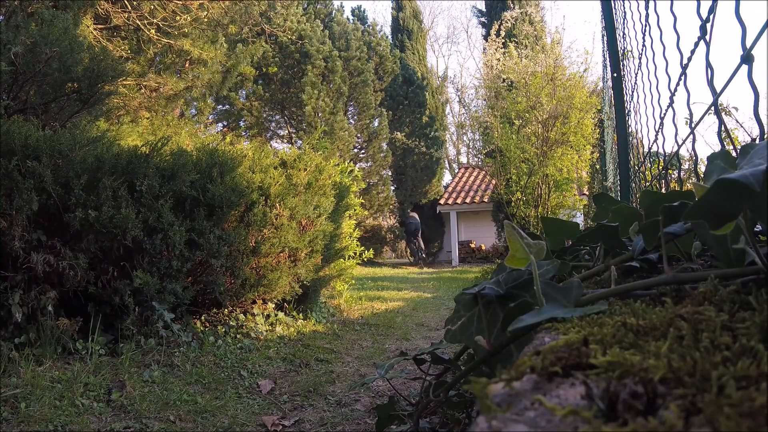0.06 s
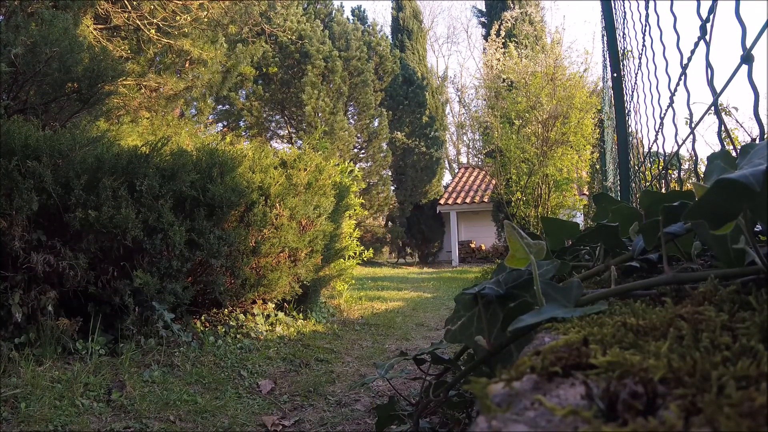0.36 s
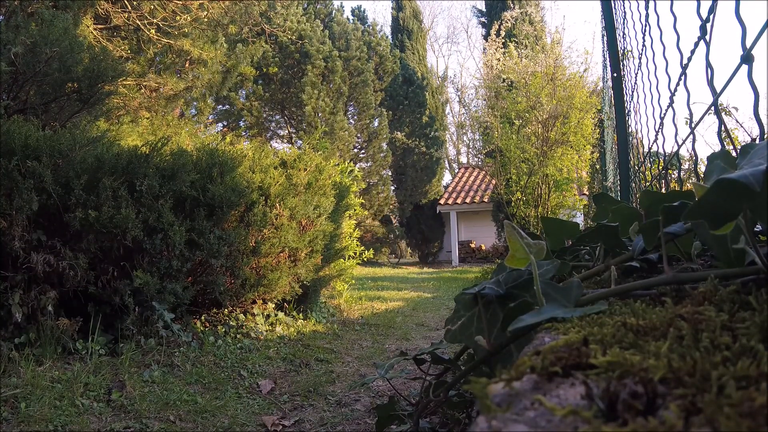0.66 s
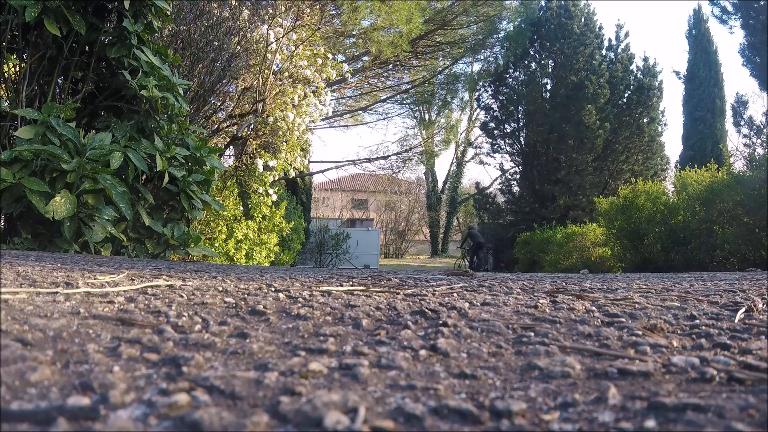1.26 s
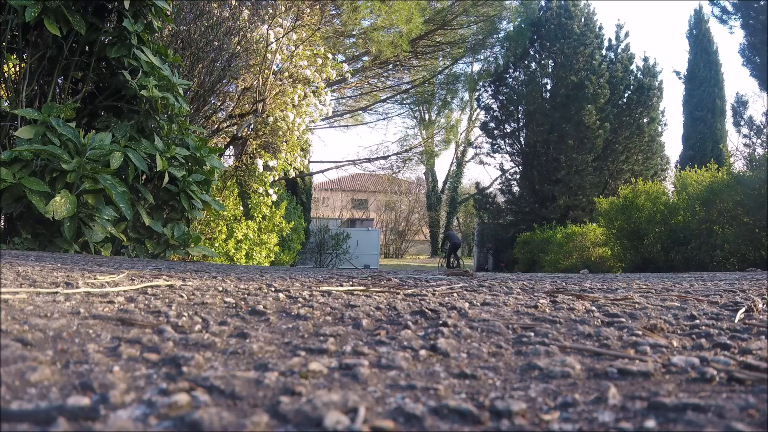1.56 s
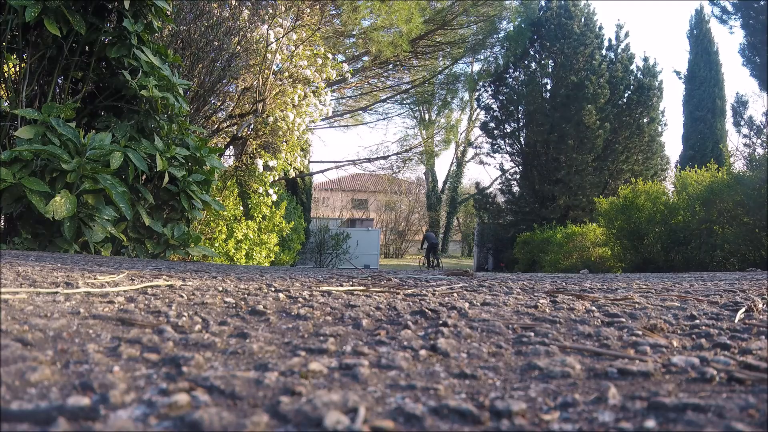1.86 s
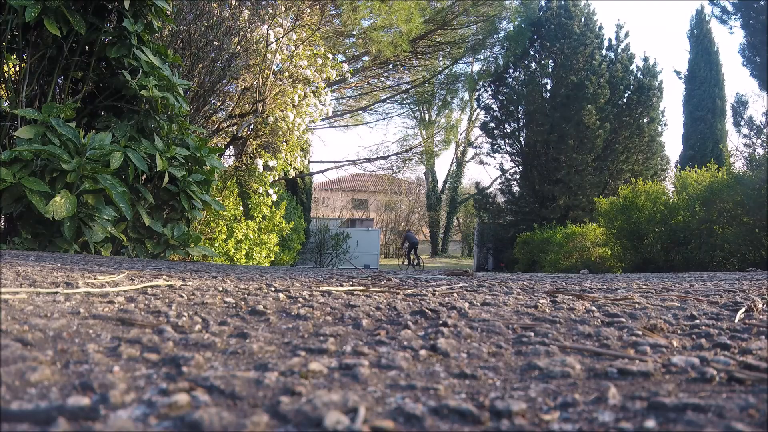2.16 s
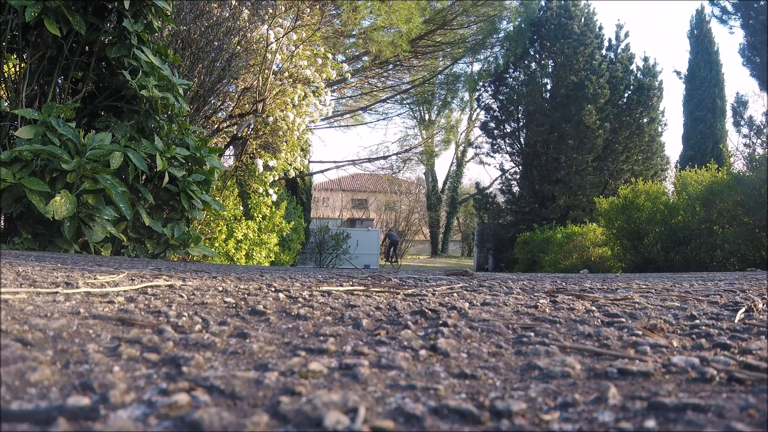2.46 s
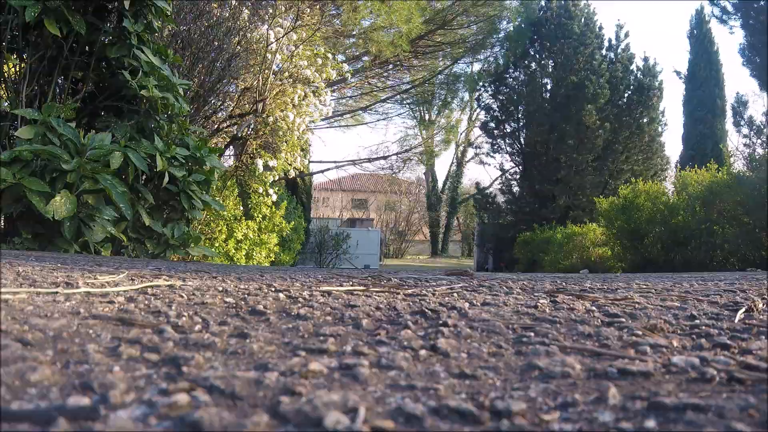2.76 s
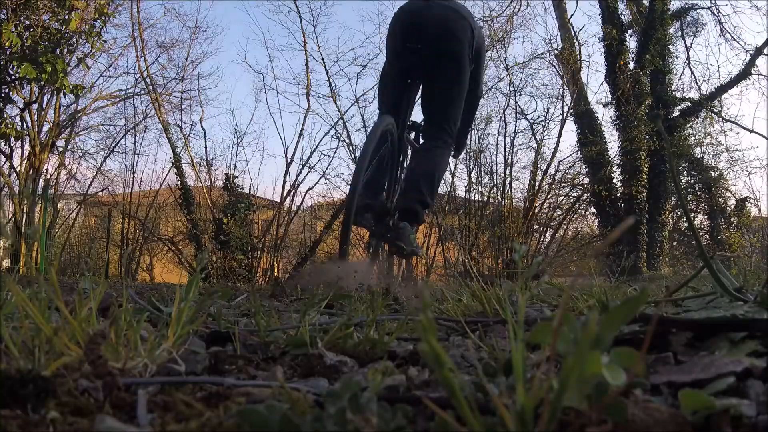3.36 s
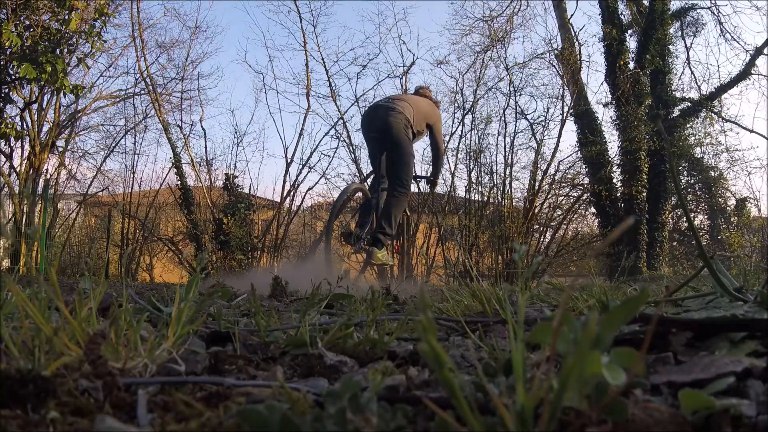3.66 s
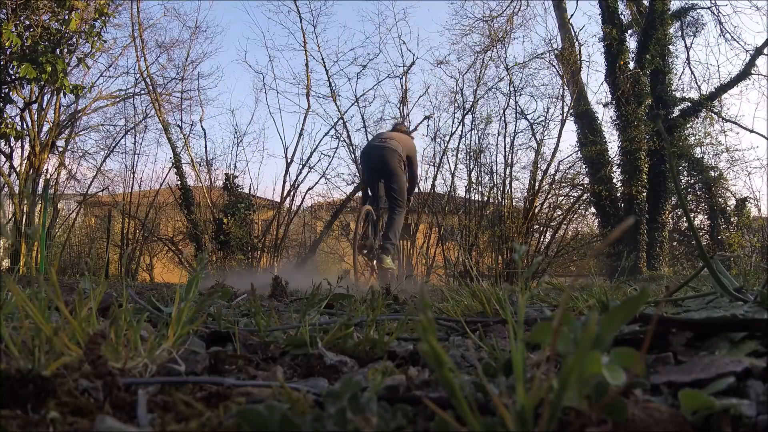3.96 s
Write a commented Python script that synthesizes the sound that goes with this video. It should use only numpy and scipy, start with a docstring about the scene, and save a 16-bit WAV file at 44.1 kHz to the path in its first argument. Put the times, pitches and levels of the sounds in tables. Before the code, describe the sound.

Bicycle tyres rush close past the microphone on dirt and grass, with loud crunching, thuds and stone knocks. Before that come soft freewheel ticks, faint birdsong and a growing gravel crackle over quiet outdoor air.

```python
"""Bicycle in a garden

Heard from three places in turn: it coasts away, freewheel pawls ticking; it crackles closer over
distant gravel while a small bird sings; then it rushes right past on dirt and grass. Up close the
tyres crush grit into tiny ringing grains, thud over bumps, flick stones and shake the frame."""
import sys
import numpy as np
from scipy import signal
from scipy.fft import rfft, irfft
from scipy.io import wavfile

SR = 44100
rng = np.random.default_rng(int(sys.argv[2]) if len(sys.argv) > 2 else 0)


def digitize_waveform(pressure):
    """Quantize a signal to 16-bit integers and store it at the path in sys.argv[1].

    Rows of a 2-D input are taken as channels; values are limited to [-1, 1].
    """
    field = np.atleast_2d(pressure).T
    bounded = np.clip(field, -1, 1)
    quanta = np.round(bounded * 32767).astype(np.int16)
    wavfile.write(sys.argv[1], SR, quanta)


N = 176400
T = np.arange(N) / SR
COAST_END_S, APPROACH_S, PASS_S = 1.158, 1.186, 2.889  # first place ends, second starts, third starts

# tone of the outdoor air at the first two places (frequency [Hz], gain [dB])
COAST_AIR_EQ = [(25, -21), (48, -12), (104, -43), (135, 0.5), (250, -4), (400, -9), (1000, -15),
                (2500, -22.5), (4500, -33.5), (6900, -24), (10500, -29.5), (15000, -45)]
APPROACH_AIR_EQ = [(25, -21.5), (102, -29.5), (132, -5.5), (165, 1.5), (260, -6), (450, -13), (1000, -17.5),
                   (4100, -32), (7000, -27), (10500, -34), (15000, -45)]
# its fader at each place (time [s], level [dB])
COAST_AIR_FADER = [(0, -56), (.35, -58.5), (.55, -60.5), (.9, -62), (1.16, -61.5)]
APPROACH_AIR_FADER = [(1.19, -54.5), (1.7, -54), (2.15, -55), (2.55, -52), (2.89, -56.5)]
# tone of the steady hiss (frequency [Hz], gain [dB])
HISS_EQ = [(4000, -25), (8000, 0), (14800, -1), (16000, -40)]

# bird twitters (time [s], length [s], start pitch [Hz], end pitch [Hz], level [dB])
CHIRPS = [(0.074, 0.034, 5050, 5330, -63), (0.144, 0.05, 6800, 6900, -67),
          (0.546, 0.035, 5930, 6200, -63.5), (1.26, 0.039, 6420, 6850, -63), (1.56, 0.036, 6800, 6060, -61)]
# cues of the two-note song (time [s])
SONG_CUES = [1.332, 1.645, 1.948]
# its notes (delay [s], pitch [Hz], level [dB], decay [s])
SONG_NOTES = [(0, 3567, -61, .075), (0.067, 4850, -61, 0.11)]

# distant tyres drawing nearer (time [s], level [dB])
CRACKLE_FADER = [(1.19, -68.5), (2.1, -69), (2.45, -61), (2.89, -54.5)]
# gravel popping under them (time [s], level [dB], rise [s])
PEBBLE_POPS = [(0.053, -62, 0.0083), (1.221, -26, 0.00024), (1.23, -49, 0.0027), (1.346, -37, 0.00014),
               (2.267, -41, 0.0021), (2.305, -48, 0.0025), (2.3465, -45.5, 0.0017), (2.493, -39, 0.0023),
               (2.537, -42.5, 0.002), (2.8, -40, 0.0041), (2.852, -36, 0.0053)]
# freewheel moving away (time [s], rate [ticks/s], level [dB])
FREEWHEEL_TICKS = [(.055, 20, -57.5), (.25, 39, -64), (.6, 34, -72), (1.15, 22, -76)]
# tone of the crackle, pops and ticks (frequency [Hz], gain [dB])
CRACKLE_EQ = [(200, -11), (1200, 1), (2500, -2.5), (4000, -17), (6000, -40), (7500, -36)]
POP_EQ = [(400, -8), (900, 4), (2700, 4), (4200, -5), (4900, 4.5), (5900, 5.5), (6900, -15.5), (15000, -41)]
PAWL_EQ = [(600, -6), (3000, -0.5), (6200, -2), (6900, -16), (15000, -39)]

# close tyres rolling (time [s], crunch [dB], rumble [dB], grit [dB])
ROLL_FADERS = [(2.889, -27, -22.5, -51), (2.91, -22, -35, -35.5), (2.99, -21.5, -29.5, -37),
               (3.04, -12, -18.5, -26.5), (3.108, -25, -18, -61), (3.22, -15, -22, -38),
               (3.39, -16, -29, -35), (3.45, -21.5, -24, -38.5), (3.51, -15, -24, -37),
               (3.57, -27.5, -27, -45), (3.645, -22, -26.5, -44.5), (3.725, -30, -39, -50.5),
               (3.8, -28, -33.5, -46.5), (3.92, -34, -37.5, -56), (4, -40, -36.5, -58)]
# surges as a tyre bites the ground (time [s], length [s], crunch [dB], rumble [dB], grit [dB])
TYRE_BITES = [(2.932, 0.032, -11, -20.5, -31), (3.005, 0.017, -13.5, -13.5, -27),
              (3.024, 0.076, -14.5, -38, -29.5), (3.116, 0.024, -10, -21, -30),
              (3.16, 0.012, -17.5, -30, -29), (3.17, 0.019, -11, -18, -56),
              (3.216, 0.012, -9.5, -21.5, -27), (3.323, 0.014, -15, -17, -36),
              (3.346, 0.01, -25, -44, -28.5), (3.374, 0.026, -25, -31, -27.5),
              (3.738, 0.017, -26.5, -52, -39.5), (3.775, 0.019, -34.5, -32, -39.5),
              (3.875, 0.015, -24.5, -31.5, -52), (3.954, 0.018, -26, -27.5, -69)]
# spray of dust and grass (time [s], level [dB])
FIZZ_FADER = [(2.889, -60.5), (2.94, -53.5), (3.4, -55.5), (3.6, -57), (4, -67)]
# dry stalks and sand grains cracking (time [s], level [dB])
STALK_SNAPS = [(2.9287, -40.5), (2.981, -42.5), (3.123, -41.5), (3.15, -41), (3.377, -44), (3.593, -48)]
# stones knocked aside (time [s], level [dB], pitch [Hz])
STONE_KNOCKS = [(3.0994, 1, 1650), (3.1217, -7, 800), (3.1898, -11, 980), (3.2066, -14, 2530),
                (3.2242, -10, 1670), (3.2455, -5.5, 1540), (3.3237, 0, 1119), (3.3284, -4, 1430),
                (3.351, -3.5, 1850), (3.3871, -3.5, 1310), (3.64, -13, 1030), (3.659, -35, 1210),
                (3.746, -21, 1380), (3.826, -15.5, 730), (3.844, -18, 1350)]
# a low thump as the scene changes to the close pass, then wheel thuds (time [s], level [dB], pitch [Hz])
LOW_THUMPS = [(2.883, -19.5, 111), (3.039, -9, 144), (3.119, -6, 147), (3.187, -11.5, 194),
              (3.326, -8, 227)]
# resonances of wheels and frame (frequency [Hz], bandwidth [Hz], gain [dB])
FRAME_MODES = [(316, 43, -8.5), (727, 25, 0), (1454, 40, -5)]
# tone of each close layer (frequency [Hz], gain [dB])
FIZZ_EQ = [(2000, -16), (6500, -1), (9000, -1.5), (11000, -3.5), (11800, -13), (15000, -21)]
SNAP_EQ = [(2500, -6), (4500, -3), (10500, -0.5), (15000, -22)]
GRIT_EQ = [(500, -15), (2000, 6.5), (3000, -3.5), (4200, -3.5), (6200, -6.5), (6700, -21), (15000, -30)]
RUMBLE_EQ = [(25, -15), (95, -32), (128, -7), (200, 1.5), (320, 0), (430, -13), (700, -12.5), (4000, -76)]
CRUNCH_EQ = [(100, -39), (250, -10.5), (450, -1), (750, 0.5), (950, -1.5), (1300, 1.5), (2000, -3.5),
             (2700, -6.5), (3500, -19), (6000, -66), (15000, -76)]


def amp(db):
    """Decibels to gain."""
    return 10 ** (np.asarray(db) / 20)


def unit(x):
    """Scales to rms 1."""
    return x / np.sqrt(np.mean(x ** 2) + 1e-20)


def curve(rows, column=1):
    """One column of a table as an automation curve."""
    rows = np.array(rows)
    return np.interp(T, rows[:, 0], rows[:, column])


def add(mix, start_s, sound):
    """Drops a sound into the mix at its cue."""
    part = mix[max(round(start_s * SR), 0):][:len(sound)]
    part += sound[:len(part)]


def eq(x, points):
    """Minimum-phase EQ of unit energy: the points set only the tone."""
    size = 8192
    hz, db = np.transpose(points)
    bins_hz = np.fft.rfftfreq(size, 1 / SR)
    log_gain = np.log(amp(np.interp(np.log(bins_hz + 1), np.log(hz + 1), db)))
    cepstrum = irfft(log_gain)
    cepstrum[1:size // 2] *= 2  # folded forward, so nothing rings ahead of a hit
    cepstrum[size // 2 + 1:] = 0
    taps = irfft(np.exp(rfft(cepstrum)))[:size // 2]
    return signal.oaconvolve(x, taps / np.linalg.norm(taps))[:N]


def lowpass(x, hz, order):
    """Smooth roll-off above hz."""
    return irfft(rfft(x) / np.sqrt(1 + (np.fft.rfftfreq(N, 1 / SR) / hz) ** (2 * order)), N)


def wander(rate_hz):
    """Smooth random modulation of rms 1."""
    rolloff = 1 + (np.fft.rfftfreq(N, 1 / SR) / rate_hz) ** 4
    return unit(irfft(rfft(rng.standard_normal(N)) / rolloff, N))


def clicks(per_s, spread_db):
    """Random fractures as clicks of uneven size."""
    size = amp(spread_db * np.minimum(rng.exponential(1, N), 4))
    return unit(size * rng.choice([-1, 1], N) * (rng.random(N) < per_s / SR))


def grains(per_s, spread_db, clump_db, decay_cycles, sizes=14):
    """Grit of many sizes, each with its own short ring and its own clumps."""
    t, out = np.arange(SR // 20) / SR, np.zeros(N)
    for hz in np.geomspace(300, 7000, sizes):
        ring = np.exp(-t * hz / decay_cycles) * np.sin(2 * np.pi * hz * t)
        train = clicks(per_s / sizes, spread_db) * amp(clump_db * wander(76))
        out += signal.oaconvolve(train, ring * hz)[:N]
    return unit(out)


def swell(age):
    """Envelope that peaks at age 1 and dies away."""
    return age * np.exp(1 - age)


def burst(rise_s):
    """A cluster of tiny fractures, as one puff of noise."""
    t = np.arange(SR // 10) / SR
    return swell(t / rise_s) * rng.standard_normal(len(t))


def reverb(x, t60_s):
    """Diffuse reflections from hedges and trees."""
    t = np.arange(SR // 2) / SR
    reflections = rng.standard_normal(len(t)) * (rng.random(len(t)) < .05)
    tail = reflections * np.exp(-np.log(1000) * t / t60_s) * (t > .008)
    return signal.oaconvolve(x, tail / np.linalg.norm(tail))[:N]


def air():
    """Outdoor bed: a murmur with fluttering lows that dips between the first two places, plus hiss."""
    first_db = np.where(T < COAST_END_S, curve(COAST_AIR_FADER), -84)
    first = eq(rng.standard_normal(N), COAST_AIR_EQ) * amp(first_db)
    second = eq(rng.standard_normal(N), APPROACH_AIR_EQ) * amp(curve(APPROACH_AIR_FADER))
    bed = first * (T < APPROACH_S) + second * (T > APPROACH_S)
    flutter = lowpass(bed, hz=1510, order=2) * (amp(0.42 * wander(16)) - 1)
    hiss = amp(-82) * eq(rng.standard_normal(N), HISS_EQ)
    return bed + flutter + hiss


def birds():
    """Thin gliding twitters and a two-note song; at the second place they trail off among the trees."""
    out, waver = np.zeros(N), wander(270)
    for start_s, length_s, start_hz, end_hz, db in CHIRPS:
        progress = np.clip((T - start_s) / length_s, 0, 1)
        hz = (start_hz + (end_hz - start_hz) * progress) * (1 + .015 * waver)
        envelope = np.sqrt(abs(np.sin(np.pi * progress)))
        out += amp(db) * envelope * np.sin(2 * np.pi * np.cumsum(hz) / SR)
    attack_s = 0.0094
    for delay_s, hz, db, decay_s in SONG_NOTES:
        ages = [np.maximum(T - cue_s - delay_s, 0) for cue_s in SONG_CUES]
        envelope = sum(np.minimum(age / attack_s, 1) * np.exp(-age / decay_s) for age in ages)
        whistle = np.sin(2 * np.pi * np.cumsum(hz * (1 + 0.011 * waver)) / SR)
        out += amp(db + 2.0 * wander(30)) * envelope * whistle
    return out + 0.78 * reverb(out * (T > APPROACH_S), t60_s=0.41)


def distant_tyres():
    """Faint gravel crackle that builds as the bicycle approaches."""
    crackle = grains(per_s=1600, spread_db=0.2, clump_db=3.5, decay_cycles=1.3)
    return unit(eq(crackle, CRACKLE_EQ)) * amp(curve(CRACKLE_FADER)) * (T > APPROACH_S) * (T < PASS_S)


def pebbles():
    """Pebbles pop out from under the tyres; short pops are thin, long ones duller."""
    out = np.zeros(N)
    for start_s, db, rise_s in PEBBLE_POPS:
        low_cut = signal.butter(2, min(.5 / rise_s, SR / 32), "high", fs=SR)
        high_cut = signal.butter(1, min(11 / rise_s, SR / 4), fs=SR)
        pop = signal.lfilter(*low_cut, burst(rise_s))
        add(out, start_s, amp(db) * signal.lfilter(*high_cut, pop))
    out = eq(out, POP_EQ)
    return out + amp(-10) * reverb(out, t60_s=0.31)


def freewheel():
    """The pawls tick as the bicycle coasts away, each tick a fast-decaying flick of noise."""
    rate, decay_s = curve(FREEWHEEL_TICKS), 0.014
    teeth_passed = np.cumsum(rate * (T > FREEWHEEL_TICKS[0][0])) / SR
    age = teeth_passed % 1 / rate
    ticks = np.exp(-age / decay_s) * (teeth_passed > 0) * (T < COAST_END_S)
    fader = amp(curve(FREEWHEEL_TICKS, column=2) + wander(11))
    return eq(ticks * fader * rng.standard_normal(N), PAWL_EQ)


def fizz():
    """Dense dust and sparse sand make an airy top layer."""
    sand = amp(-7) * clicks(per_s=200, spread_db=2.2)
    dust = clicks(per_s=11000, spread_db=4.0)
    return eq(dust + sand, FIZZ_EQ) * amp(curve(FIZZ_FADER) + wander(58)) * (T > PASS_S)


def snaps():
    """Dry stalks and sand grains crack brightly through the spray."""
    out = np.zeros(N)
    for start_s, db in STALK_SNAPS:
        add(out, start_s, amp(db) * burst(rise_s=.0018))
    return eq(out, SNAP_EQ)


def stones():
    """Each flicked stone gives one dead knock that swells for half a cycle up to its cue."""
    out, t = np.zeros(N), np.arange(SR // 50) / SR
    for peak_s, db, hz in STONE_KNOCKS:
        rise_s = .5 / hz
        add(out, peak_s - rise_s, amp(db) * swell(t / rise_s) * np.sin(2 * np.pi * hz * t))
    return out


def thumps(rise_s=0.0041):
    """A short low thump comes as the scene changes to the close pass; the later ones are wheels thudding on the
    soil."""
    out, t = np.zeros(N), np.arange(SR // 10) / SR
    for start_s, db, hz in LOW_THUMPS:
        add(out, start_s, amp(db) * swell(t / rise_s) * np.sin(2 * np.pi * hz * t))
    return out


def tyre_pressure(column):
    """Envelope of one close tyre layer: rolling plus the bites, summed in power."""
    power = amp(curve(ROLL_FADERS, column)) ** 2
    for start_s, length_s, *levels_db in TYRE_BITES:
        progress = np.clip((T - start_s) / length_s, 0, 1)
        power += amp(levels_db[column - 1]) ** 2 * abs(np.sin(np.pi * progress ** 0.79))
    return np.sqrt(power) * (T > PASS_S)


def grit():
    """Fine grit breaks under the tread with a bright rasp."""
    rasp = grains(per_s=11000, spread_db=-2.0, clump_db=4, decay_cycles=0.62)
    return unit(eq(rasp, GRIT_EQ)) * tyre_pressure(column=3)


def rumble():
    """Small impacts under the rolling tyres blur into low-end weight."""
    return eq(clicks(per_s=2000, spread_db=0.5) * tyre_pressure(column=2), RUMBLE_EQ)


def crunch(dull_from_s=3.16, dull_over_s=0.19):
    """Crushed dirt fills the mids and loses its edge as the bicycle recedes."""
    dirt = grains(per_s=7000, spread_db=3.0, clump_db=2.0, decay_cycles=0.96)
    jolts = amp(1.3 * wander(103))  # uneven ground loads and unloads the tyre
    near = unit(eq(dirt, CRUNCH_EQ)) * tyre_pressure(column=1) * jolts
    away = np.clip((T - dull_from_s) / dull_over_s, 0, 1)
    return (1 - away) * near + away * lowpass(near, hz=1630, order=4)


def close_pass():
    """The tyres crush and strike the ground, ringing the frame under a bright spray."""
    low_cut = signal.butter(8, 134, "high", fs=SR, output="sos")  # trims the deepest thumps
    body = signal.sosfilt(low_cut, crunch() + rumble() + stones() + thumps())
    frame = sum(amp(db) * signal.lfilter(*signal.iirpeak(hz, hz / width_hz, SR), body)
                for hz, width_hz, db in FRAME_MODES)
    tyres = amp(-4.5) * (body + amp(-5) * frame) + grit() + fizz() + snaps()
    return tyres + amp(-13) * reverb(tyres, t60_s=0.12)


def scene():
    """Air, birds and the bicycle, mixed in mono."""
    return (air() + distant_tyres() + birds() + freewheel() + pebbles() + close_pass())[None]


def record(dry):
    """Soft-clips the loudest peaks, then cuts the extreme top."""
    ceiling, cutoff_hz = .85, 15300
    rounded = dry / (1 + (dry / ceiling) ** 4) ** (1 / 4)
    high_cut = signal.firwin(511, cutoff_hz, window=("kaiser", 9), fs=SR)
    return signal.oaconvolve(rounded, high_cut[None], "same")


dry = scene()
out = record(dry)
digitize_waveform(out)
```